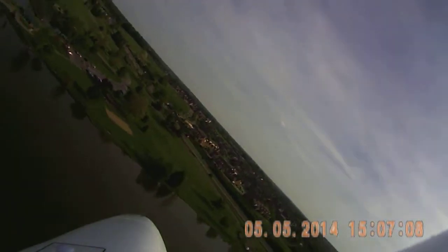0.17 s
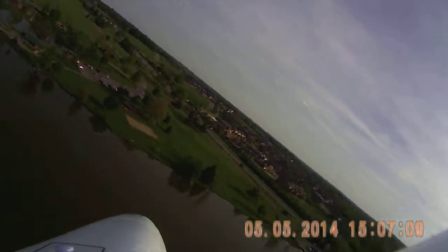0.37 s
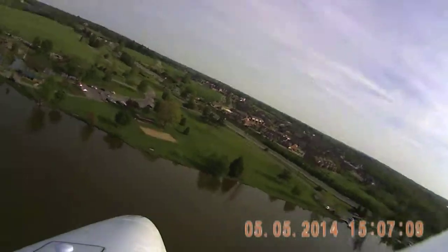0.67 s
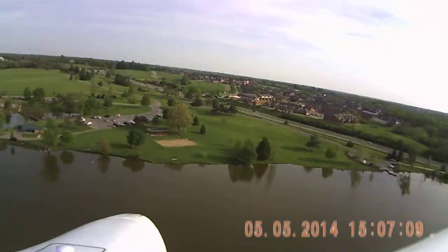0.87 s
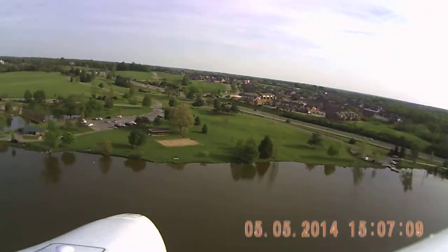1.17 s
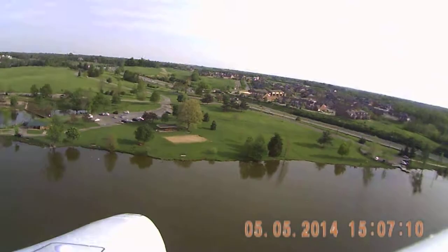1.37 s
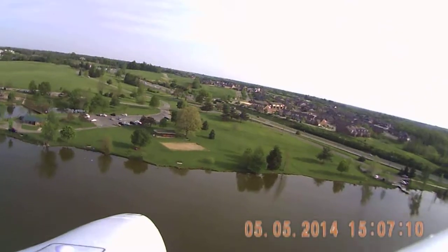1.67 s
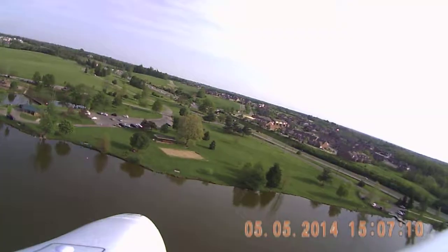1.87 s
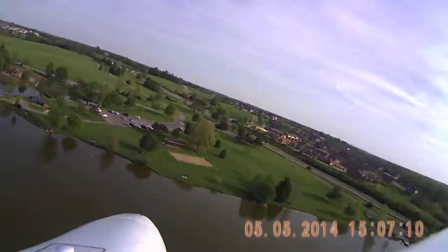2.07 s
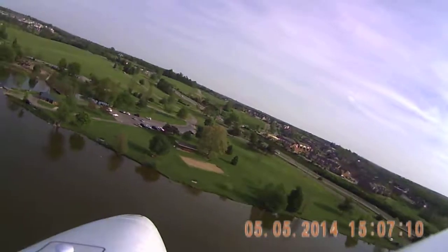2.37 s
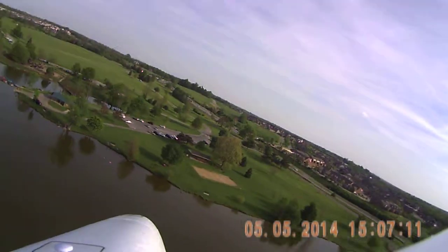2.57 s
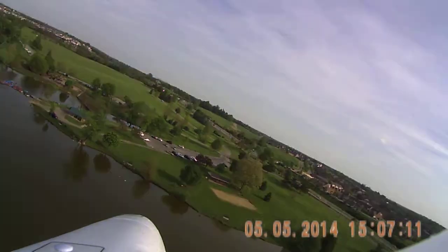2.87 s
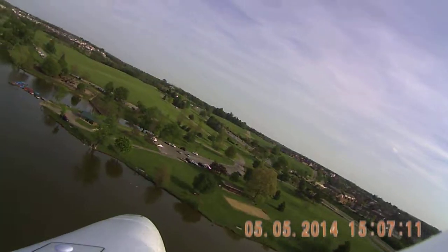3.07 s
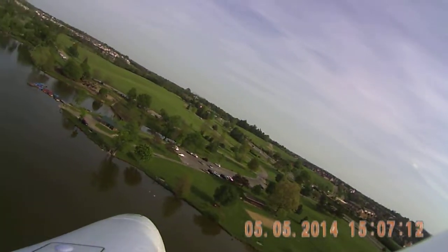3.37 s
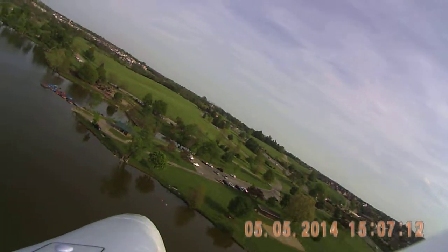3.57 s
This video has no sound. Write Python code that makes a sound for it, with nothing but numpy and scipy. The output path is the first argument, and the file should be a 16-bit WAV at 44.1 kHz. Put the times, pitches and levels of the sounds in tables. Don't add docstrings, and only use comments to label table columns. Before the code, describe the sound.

A small electric model plane's propeller starts as a loud, harsh, clipped howl, falling in pitch and level until about 0.8 s. It rises slightly around 1.3-1.6 s, then settles into a steady buzzing drone to 3.7 s. A thin, beating motor whine rides above. Wind roars throughout, with low buffets, strongest near 1.4 s. The close onboard microphone sounds dull and narrow, outdoors without echo.

```python
import sys
import numpy as np
from scipy import signal
from scipy.fft import rfft, irfft
from scipy.io import wavfile
from scipy.ndimage import uniform_filter1d

SR = 44100
rng = np.random.default_rng(int(sys.argv[2]) if len(sys.argv) > 2 else 0)


def amplitude_ratio(level_db):
    exponent = np.asarray(level_db, float) / 20
    return 10 ** exponent


def store_pcm(level_fs):
    pcm = np.round(np.clip(level_fs, -1, 1) * 32767).astype(np.int16)
    wavfile.write(sys.argv[1], SR, np.atleast_2d(pcm).T)


N = 163611
BAND_EDGE_HZ = 4000


def evened(x):
    return x / np.sqrt(np.mean(x ** 2) + 1e-20)


def read(points, hz):
    f, value = np.transpose(points)
    return np.interp(np.log(hz + 1), np.log(f + 1), value)


def drift(hz):
    spectrum = rfft(rng.standard_normal(N))
    lowpass = np.exp(-(np.fft.rfftfreq(N, 1 / SR) / hz) ** 2)
    return evened(irfft(spectrum * lowpass, N))


def shaft():
    # time in seconds, shaft rate in turns per second.
    speed = [(0.276, 175.06), (0.41, 164.97), (0.521, 163.84), (0.66, 148.22), (0.821, 142.91),
             (1.167, 142.85), (1.285, 149.59), (1.624, 147.68), (1.894, 144.026), (1.98, 144.488),
             (2.173, 142.771), (2.388, 143.195), (2.718, 142.675), (2.771, 144.415), (2.965, 144.255),
             (3.131, 143.825), (3.406, 144.166), (3.7, 143.876)]
    inertia_s, cruise_hz, full_hz, load_bend = 0.06, 143, 175, 0.85
    hz = np.interp(np.arange(N) / SR, *np.transpose(speed))
    hz = uniform_filter1d(hz, round(inertia_s * SR), mode="nearest")
    load = np.clip((hz - cruise_hz) / (full_hz - cruise_hz), 0, 1) ** load_bend
    angle = 2 * np.pi * np.cumsum(hz) / SR
    return hz, angle, load


def propeller(hz, angle, load):
    # multiple of the shaft rate, cruise level in dB, full-throttle level in dB.
    orders = [(1, -27.5, -31.5), (2, -20.5, -7.5), (3, -29.5, -22.5), (4, -24, -15), (5, -50, -39.5),
              (5.982, -31, -21), (6.995, -37.5, -35), (7.965, -39, -35), (9.1, -42.5, -44.5),
              (10.074, -43, -32.5), (11, -49.5, -43), (11.985, -41.5, -31), (13, -45, -35.5),
              (15.02, -41, -40.5), (16, -45.5, -32), (18.16, -48, -37), (19.02, -53, -47.5),
              (21.11, -40.5, -46), (22.05, -50, -51.5), (29.86, -52.5, -59)]
    # frequency in Hz, width in Hz, gain in dB.
    resonances = [(454, 16, 4.5), (793, 63, 15.5)]
    smear, jitter = 0.07, 0.045
    waver_hz = 16
    waver_db = 1 + (0.5 - 1) * load
    out = np.zeros(N)
    for multiple, cruise_db, full_db in orders:
        k = round(multiple)
        shake_db = 0
        if k % 2:
            shake_db = sum(gain * np.exp(-((k * hz - f) / spread) ** 2) for f, spread, gain in resonances)
        order_db = shake_db + cruise_db + (full_db - cruise_db) * load
        level = amplitude_ratio(order_db + waver_db * drift(waver_hz))
        phase = k * angle - smear * k ** 2 + jitter * waver_db * drift(waver_hz)
        out -= np.sqrt(2) * level * np.cos(phase)
    return out


def magnet_tone(hz, angle):
    # frequency in Hz, level in dB.
    magnet_response = [(2000, -27.5), (2030, -27.5), (2090, -27.5), (2180, -30), (2300, -30.5),
                       (2450, -24.5)]
    magnets, lead = 14, 0.75
    level = amplitude_ratio(read(magnet_response, magnets * hz) + 0.29 * drift(19))
    return np.sqrt(2) * level * np.cos(magnets * angle + lead + 0.1 * drift(30))


def controller_whine(hz, angle):
    # frequency in Hz, level in dB.
    whine_response = [(700, -43), (1200, -28.5), (1550, -37), (1780, -30.5), (1990, -29.5), (2050, -28)]
    steps, switch_hz, lead = 42, 8053.6, 1.36
    switching = 2 * np.pi * switch_hz * np.arange(N) / SR + lead
    level = amplitude_ratio(read(whine_response, switch_hz - steps * hz) + 0.97 * drift(17))
    return np.sqrt(2) * level * np.cos(switching - steps * angle + 0.098 * drift(30))


def electrical_tone():
    tone_hz, tone_db = 3950, -54
    t = np.arange(N) / SR
    wander = 0.5 * drift(15)
    pair_hz = (tone_hz, 2 * BAND_EDGE_HZ - tone_hz)
    return np.sqrt(2) * amplitude_ratio(tone_db) * sum(np.cos(2 * np.pi * f * t + wander) for f in pair_hz)


def slipstream(shaft_hz, angle, load):
    # frequency in Hz, density in dB per Hz.
    air_spectrum = [(25, -28), (60, -12), (130, -1.5), (350, 1.5), (1000, -4), (2000, -11), (2600, -14.5),
                    (4000, -17.5)]
    patch_db, swell_db, chop = 1.05, 0.5, 0.071
    air_db, full_db, brake_db = -18.5, -1, 0.54
    count, bins_hz = N // 256 + 5, np.fft.rfftfreq(1024, 1 / SR)
    real, imaginary, patches = rng.standard_normal((count, 513, 3)).T
    patches = uniform_filter1d(patches, size=8, axis=0)
    patches = evened(uniform_filter1d(patches, size=8, axis=1))
    cells = (real + 1j * imaginary) * amplitude_ratio(read(air_spectrum, bins_hz)[:, None] + patch_db * patches)
    roar = evened(signal.istft(cells, nperseg=1024, noverlap=768)[1][:N])
    braking = uniform_filter1d(np.maximum(-np.gradient(shaft_hz) * SR, 0), size=SR // 4)
    roar_db = brake_db * braking / 60 + air_db + full_db * load + swell_db * drift(2.1)
    return roar * amplitude_ratio(roar_db) * (1 + chop * np.cos(2 * angle))


def gusts():
    # time in seconds, level over the gusts in dB.
    buffets = [
        (.31, 6),
        (.62, 9),
        (0.932, 5),
        (1.3, 5),
        (1.38, 14.5),
        (1.651, 8),
        (2.76, 9),
        (2.968, -2.5),
    ]
    gust_db, gust_hz, spread_hz, lump_db, buffet_s = -30.5, 242, 150, 3, 0.028
    f = np.fft.rfftfreq(N, 1 / SR)
    band = np.exp(-((f - gust_hz) / spread_hz) ** 2) * np.minimum(f / 90, 1) ** 2
    gust = irfft(rfft(rng.standard_normal(N)) * band, N)
    t = np.arange(N) / SR
    bump_db = sum(rise * np.exp(-((t - s) / buffet_s) ** 2) for s, rise in buffets)
    return amplitude_ratio(gust_db) * evened(gust * amplitude_ratio(lump_db * drift(9.9) + bump_db))


def scene():
    hz, angle, load = shaft()
    motor = magnet_tone(hz, angle) + controller_whine(hz, angle) + electrical_tone()
    air = slipstream(hz, angle, load) + gusts()
    return (propeller(hz, angle, load) + motor + air)[None]


def low_pass(x):
    return signal.sosfilt(signal.butter(12, 15850, fs=SR, output="sos"), x)


def record(dry):
    squash, input_clip, output_clip = 0.14, 0.71, 0.709
    capsule = dry - squash * np.maximum(dry, 0) ** 2
    clipped = np.clip(capsule, -input_clip, input_clip)
    over_hz = np.maximum(np.fft.rfftfreq(2 * N, 1 / SR) - BAND_EDGE_HZ, 0)
    edge = amplitude_ratio(np.maximum(-0.053 * over_hz - 4e-5 * over_hz ** 2, -140))
    narrow = irfft(rfft(clipped, 2 * N) * edge, 2 * N)[:, :N]
    return low_pass(np.clip(narrow, -output_clip, output_clip))


dry = scene()
out = record(dry)
store_pcm(out)
```